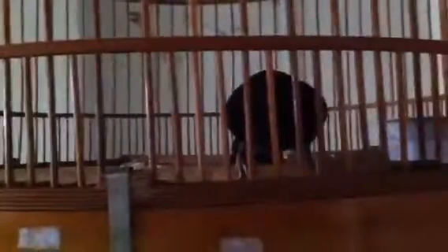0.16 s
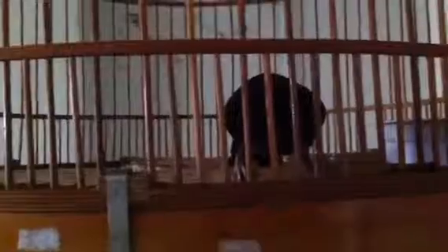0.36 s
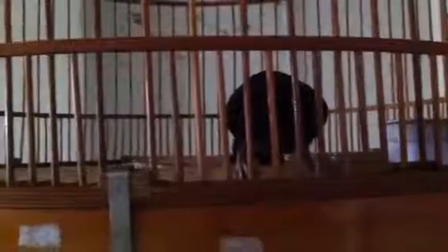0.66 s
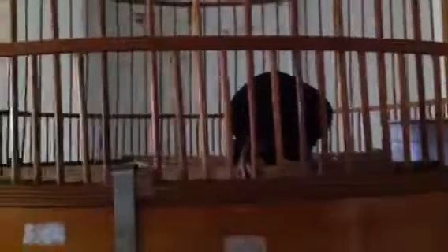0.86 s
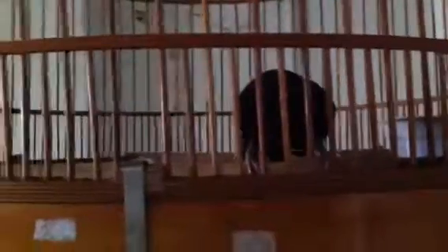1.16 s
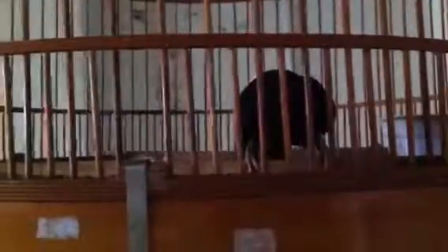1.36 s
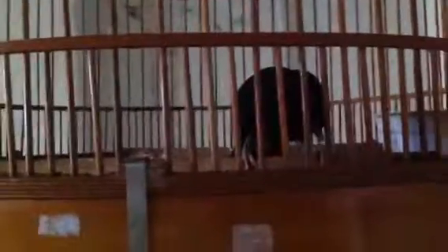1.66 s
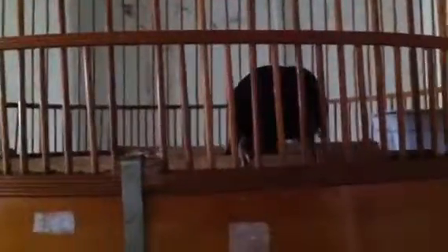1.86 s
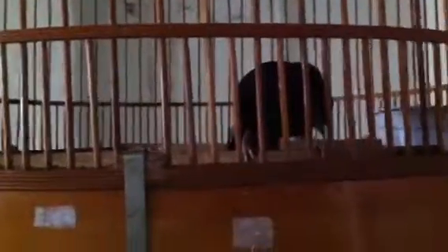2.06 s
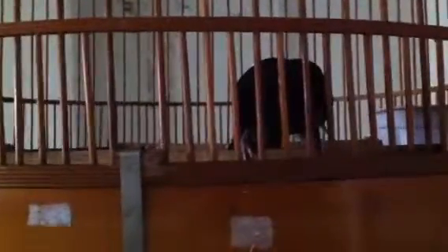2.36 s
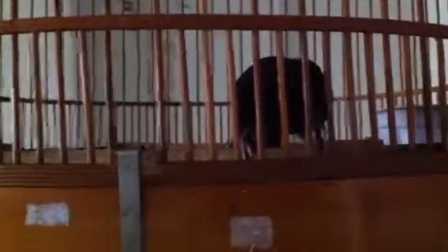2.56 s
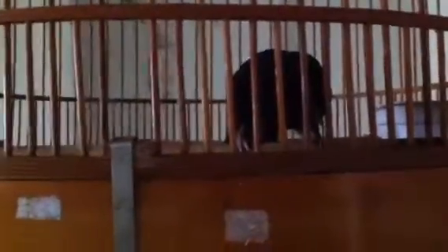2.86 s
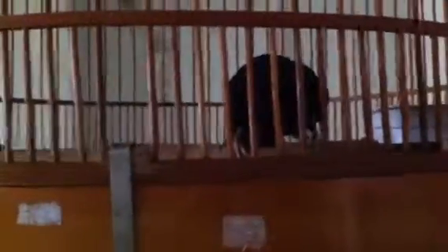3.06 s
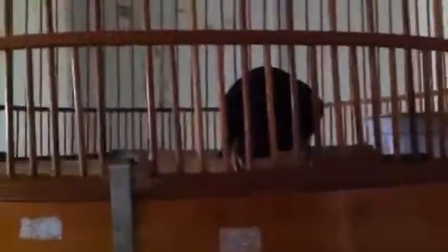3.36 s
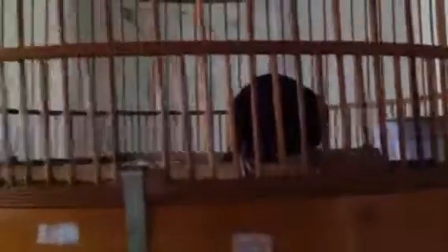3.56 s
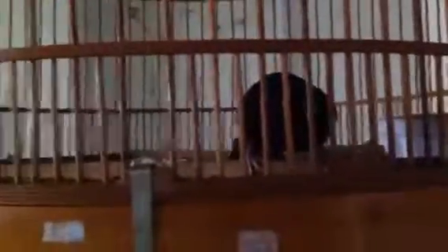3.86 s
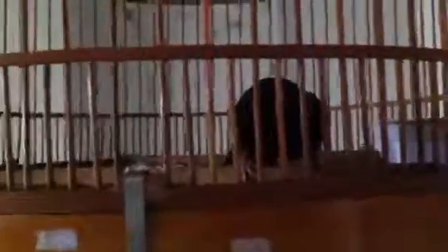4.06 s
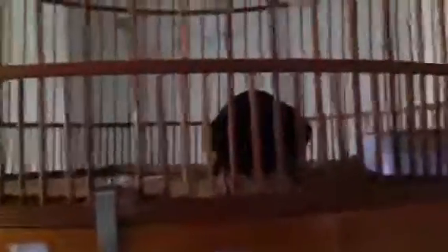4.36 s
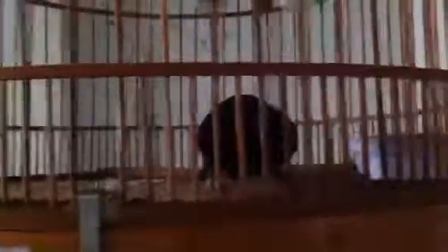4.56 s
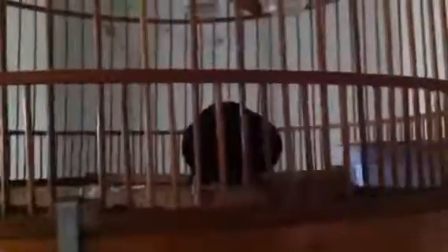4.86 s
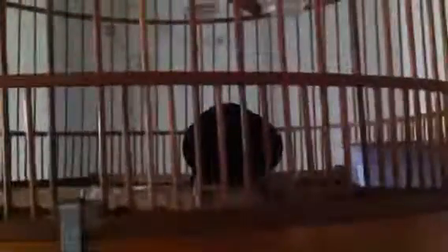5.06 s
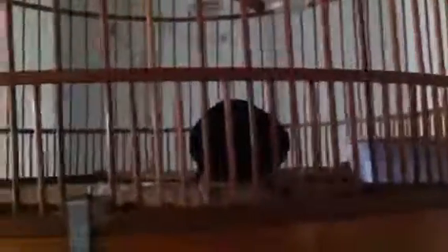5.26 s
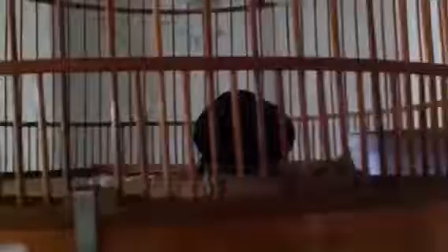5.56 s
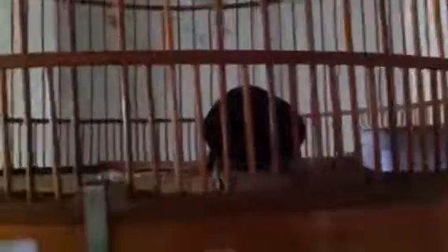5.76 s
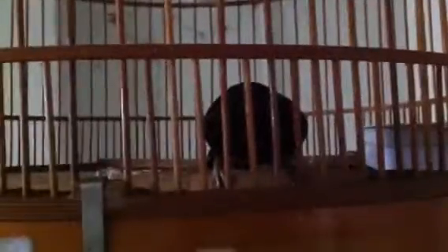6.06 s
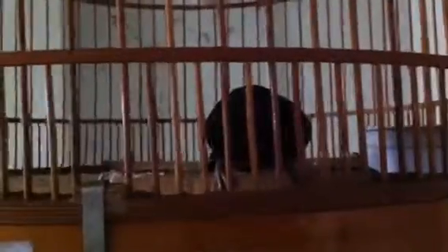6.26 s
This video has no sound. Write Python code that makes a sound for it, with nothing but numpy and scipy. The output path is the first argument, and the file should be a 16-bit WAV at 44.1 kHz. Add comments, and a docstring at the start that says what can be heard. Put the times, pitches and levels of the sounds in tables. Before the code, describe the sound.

In a small echoing room, a songbird twitters, whoops and warbles, then gives a series of high, falling whistles.

```python
"""A caged shama sings close by in a small, hard-walled room.
A brief warble and a soft twitter lead into low chuckles, loud arched whoops and a longer, harsh warble;
then come six thin, falling whistles, the first few over more twitter. Its syrinx makes gliding tones,
coloured by throat and beak and roughened by rasp; its second side joins in atop the later whoops.
Airy rustles lie between the notes, and the walls ring on after each one over faint air and hum."""
import sys
import numpy as np
from scipy import signal
from scipy.fft import rfft, irfft
from scipy.io import wavfile
from scipy.ndimage import uniform_filter1d, minimum_filter1d

SR = 44100
rng = np.random.default_rng(int(sys.argv[2]) if len(sys.argv) > 2 else 0)


def dump_mix(stems):
    """Bounce the given channels to the path in sys.argv[1] as a 16-bit WAV at rate SR."""
    frames = np.atleast_2d(stems).T  # one column per channel
    limited = np.clip(frames, -1, 1)  # hard clip at full scale
    pcm = np.round(limited * 32767).astype(np.int16)
    wavfile.write(sys.argv[1], SR, pcm)


N = 282240
T = np.arange(N) / SR


def from_db(db):
    """Decibels to gain."""
    return 10 ** (np.asarray(db) / 20)


def along(rows, at):
    """Every column of a table, joined by straight lines over its first."""
    first, *columns = np.transpose(rows)
    return [np.interp(at, np.sort(first), column) for column in columns]


def at_hz(points, hz):
    """An EQ curve, read on a log-frequency axis."""
    points_hz, values = np.transpose(points)
    return np.interp(np.log(hz + 1), np.log(points_hz), values)


def span(start, end):
    """Sample numbers between two times."""
    return np.arange(max(int(start * SR), 0), min(int(end * SR), N))


def progress(i, start, length):
    """Share of a stretch of time that has passed, 0-1."""
    return np.clip((T[i] - start) / length, 0, 1)


def noise(colour):
    """Noise shaped by an EQ curve, rms 1."""
    hz = np.arange(N // 2 + 1) * SR / N
    x = irfft(rfft(rng.standard_normal(N)) * from_db(at_hz(colour, hz)), N)
    return x / x.std()


def flutter(rate_hz):
    """Random modulation up to a given rate, rms 1."""
    x = signal.sosfilt(signal.butter(2, rate_hz, fs=SR, output="sos"), rng.standard_normal(N))
    return x / x.std()


def phase_of(hz):
    """Phase of an oscillator that follows a pitch curve."""
    return 2 * np.pi * np.cumsum(hz) / SR


def fade(i, edge_s):
    """Linear fade in and out."""
    return np.clip(np.minimum(i - i[0], i[-1] - i) / (edge_s * SR), 0, 1)


# overtone EQ of the throat and open beak: (frequency [Hz], level re the fundamental [dB])
THROAT_EQ = [(1500, -32.5), (2500, -15), (3800, -35.5), (5000, -27.5), (6300, -32.5), (8000, -32),
             (9500, -25.5), (11000, -29.5), (14000, -22.5), (16000, -39.5)]
# the beak lets most overtones out at mid pitch: (sung pitch [Hz], overtone gain [dB])
BEAK_BRIGHTNESS = [(900, -14), (1600, -4.5), (2280, 0), (2800, -1.5)]


def syrinx(notes, hiss_colour, overtone_db, jitter, shimmer_db, hiss_db, harmonics):
    """A gliding tone with weak overtones; rasp shakes its pitch, breaks up its level and adds hiss."""
    out, shake, throb, hiss = np.zeros(N), flutter(310), flutter(87), noise(hiss_colour)
    for i, hz, level_db, rasp in notes:
        phase = phase_of(hz * (1 + jitter * rasp * shake[i]))
        voice = np.sin(phase) + from_db(hiss_db) * rasp * hiss[i]
        beak_db = overtone_db + at_hz(BEAK_BRIGHTNESS, hz)
        for k in range(2, harmonics + 1):
            gain = from_db(at_hz(THROAT_EQ, k * hz) + beak_db)
            voice += gain * np.sin(k * phase) * (k * hz < SR / 2)
        out[i] += from_db(level_db + shimmer_db * rasp * throb[i]) * voice * fade(i, 0.0041)
    return out


# high sizzle on a warble: (frequency [Hz], level [dB])
WARBLE_SIZZLE = [(1000, -42), (3000, 6.5), (8000, -28), (9300, 7.5), (12000, -2.5), (16000, -5)]
# quick slurs: (time [s], length [s], first pitch [Hz], last pitch [Hz], bend [exponent], level [dB])
WARBLE_SLURS = [(0, 0.017, 1722, 2580, 1.26, -13), (0.016, 0.039, 3240, 2190, .9, -13.5),
                (0.044, .033, 1898, 1489, 1.14, -11.5), (2.663, 0.035, 1766, 1313, 1.1, -17.5),
                (2.69, 0.043, 2010, 2390, 0.37, -18.5), (2.731, 0.023, 3320, 2520, 0.56, -15),
                (2.76, 0.035, 1907, 1453, 0.77, -15), (2.892, .038, 1820, 2662, 1.68, -7),
                (2.944, .042, 3190, 2203, 1.33, -13), (2.988, 0.03, 1712, 1643, 0.85, -10.5),
                (3.007, 0.05, 1792, 2190, 0.24, -15.5), (3.06, 0.033, 3054, 2237, 1.04, -14.5),
                (3.09, 0.031, 1770, 1562, 0.75, -12)]


def warbles(wobble_hz=47.56, wobble_depth=0.033, edge_db=-5.5, rasp=0.11):
    """Harsh runs of wavering slurs that rise, fall and land low, each slur loudest in its middle."""
    notes = []
    for start, length, first_hz, last_hz, bend, peak_db in WARBLE_SLURS:
        i = span(start, start + length)
        share = progress(i, start, length)
        glide_hz = first_hz + (last_hz - first_hz) * share ** bend
        wobble = 1 - wobble_depth * np.cos(2 * np.pi * wobble_hz * (T[i] - start))
        notes.append((i, glide_hz * wobble, peak_db + edge_db * (2 * share - 1) ** 2, rasp))
    return syrinx(notes, WARBLE_SIZZLE, overtone_db=-1.5, jitter=0.19, shimmer_db=18,
                  hiss_db=-6.5, harmonics=8)


# narrow burr under the twitter: (frequency [Hz], level [dB])
BURR_EQ = [(1000, -36), (1250, -17), (1450, -4), (1650, 0), (1800, -9), (2000, -1.5), (2300, -20),
           (3000, -42)]
# bouts of twitter: (time [s], first pitch [Hz], settled pitch [Hz], first level [dB],
# settled level [dB], last note level [dB], lead-in level [dB])
TWITTER_BOUTS = [(.275, 1979, 2133, -45, -34.5, -45.5, -55.5), (3.825, 1874, 2086, -45, -37.5, -53, -59)]


def twitter(count=11, note_s=0.078, pace_s=0.095, slowing_s=0.0012, settle_notes=1.8, jitter=0.012,
            lead_s=0.17, lead_hz=987, lead_jitter=0.05, throb_db=2, burr_db=-48.5, burr_hold_s=1.013):
    """A hoarse low lead-in, then soft pulsing notes that slow a little and settle, over a burr."""
    out, shake, throb, burr = np.zeros(N), flutter(130), flutter(45), noise(BURR_EQ)
    for start, first_hz, settled_hz, first_db, settled_db, last_db, lead_db in TWITTER_BOUTS:
        notes = [(start - lead_s, lead_s, lead_hz, lead_db, lead_jitter)]
        for k in range(count):
            unsettled = np.exp(-k / settle_notes)
            hz = settled_hz + (first_hz - settled_hz) * unsettled
            level_db = last_db if k == count - 1 else settled_db + (first_db - settled_db) * unsettled
            notes.append((start + pace_s * k + slowing_s * k ** 2, note_s, hz, level_db, jitter))
        for onset, length, hz, level_db, unsteady in notes:
            i = span(onset, onset + length)
            tone = np.sin(phase_of(hz * (1 + unsteady * shake[i])))
            out[i] += from_db(level_db + throb_db * throb[i]) * tone * fade(i, 0.012)
        # the burr fades in at 133 dB/s and out at 147 dB/s
        drop_db = 133 * np.maximum(start - T, 0) + 147 * np.maximum(T - start - burr_hold_s, 0)
        out += from_db(burr_db - drop_db) * burr
    return out


# a rustle's airy top and its lower body: (frequency [Hz], level [dB])
RUSTLE_TOP_EQ = [(1000, -18.5), (2500, -4.5), (3700, -2), (6300, -2), (10000, -13), (16000, -26.5)]
RUSTLE_BODY_EQ = [(300, -29), (550, -11), (750, -4), (1100, -6.5), (1500, -1.5), (2500, -1), (4000, -2.5),
                  (8000, -30)]
# rustle cues: (time [s], length [s], level [dB], body re the top [dB])
RUSTLE_CUES = [(0.562, 0.11, -49.5, -20), (0.776, 0.12, -49.5, -13), (1.032, 0.21, -49.5, -6.5),
               (1.696, 0.057, -42, -7), (1.923, 0.18, -46.5, 2), (2.2, 0.081, -47, 3.5),
               (3.345, 0.11, -50.5, -7.5), (3.581, 0.093, -44.5, -21), (3.76, 0.2, -47.5, -8.5),
               (3.98, 0.18, -46.5, -5), (4.289, 0.16, -49.5, -2), (5.132, 0.11, -44.5, -10.5),
               (5.488, 0.14, -45.5, -6), (5.693, 0.23, -46, -3), (6.098, 0.15, -45, -5)]


def rustles(edge_s=0.03):
    """Short, soft puffs of noise between the notes."""
    out, top, body = np.zeros(N), noise(RUSTLE_TOP_EQ), noise(RUSTLE_BODY_EQ)
    for start, length, level_db, body_db in RUSTLE_CUES:
        i = span(start, start + length)
        out[i] += from_db(level_db) * (top[i] + from_db(body_db) * body[i]) * fade(i, edge_s)
    return out


# broad hiss of rasp, shared by chuckles, whoops and upper voice: (frequency [Hz], level [dB])
RASP_EQ = [(1500, -22.5), (3300, -5.5), (8200, 7), (10500, -7.5), (15000, -8)]
# low notes around the whoops; a positive scoop starts flat, a negative one drops in from above:
# (middle time [s], length [s], middle pitch [Hz], level [dB], scoop [share of pitch])
CHUCKLE_NOTES = [(1.137, 0.065, 948.6, -19, 0.24), (1.189, .054, 1217, -13.5, .12),
                 (1.239, 0.035, 996, -11.5, 0.24), (1.305, 0.049, 899, -12.5, 0.19),
                 (1.425, 0.051, 794, -24, -0.082), (1.523, .055, 868.4, -20, 0.15),
                 (1.626, 0.034, 902.5, -13, -0.13), (1.737, 0.049, 903.7, -17, 0.19),
                 (1.847, 0.03, 886, -18.5, -0.19), (1.965, .05, 890, -22, 0.06),
                 (2.104, 0.046, 900, -20, -0.41), (2.231, 0.052, 873, -23.5, 0.3),
                 (2.351, .046, 902.7, -18.5, -0.39), (2.461, 0.038, 943, -19.5, 0.27),
                 (2.591, .04, 1435, -11.5, -.15)]


def chuckles(sag=0.056, edge_db=-21, taper=1.01, rasp=0.22):
    """Short, mellow notes: the pitch slides in as each swells and sags as it fades."""
    notes = []
    for middle, length, middle_hz, peak_db, scoop in CHUCKLE_NOTES:
        i = span(middle - length / 2, middle + length / 2)
        side = 2 * progress(i, middle - length / 2, length) - 1
        hz = middle_hz * (1 - np.where(side < 0, scoop, sag) * side ** 2)
        notes.append((i, hz, peak_db + edge_db * np.abs(side) ** taper, rasp))
    return syrinx(notes, RASP_EQ, overtone_db=0.5, jitter=0.07, shimmer_db=10.5,
                  hiss_db=-27, harmonics=10)


# loud arches: (time [s], climb [s], first pitch [Hz], top pitch [Hz], bend [exponent],
# onset flick [0-1], level [dB], rasp at the top [0-1], dive [s], landing pitch [Hz])
WHOOP_NOTES = [(1.35, 0.022, 1793, 2465, 1.09, 0.05, -8.5, 0.58, 0.024, 1700),
               (1.551, 0.032, 2150, 2894, 1.3, 0.95, -3, 0, 0.029, 1050),
               (1.762, .05, 2220, 2700, .85, 1, -5.5, .4, 0.019, 1000),
               (1.994, 0.077, 2284, 2747, 0.64, 0.6, -6.5, 0.5, 0.05, 1050),
               (2.255, .055, 2275, 2970, 1.8, 0.4, -6.5, .4, 0.033, 1072),
               (2.484, .056, 2100, 2727, 0.88, 0, -6, 0.26, 0.045, 1450)]


def whoops(leap_s=0.02, low_hz=1050, attack_s=0.0066, release_s=0.013,
           flick_hz=234, flick_s=0.004, first_rasp=0.12):
    """The voice leaps from its low register, climbs while it swells and roughens, then dives away."""
    notes = []
    for row in WHOOP_NOTES:
        start, climb_s, first_hz, top_hz, bend, flick, peak_db, top_rasp, dive_s, landing_hz = row
        i = span(start - leap_s, start + climb_s + dive_s)
        t = T[i] - start
        leap = np.sin(np.pi / 2 * progress(i, start - leap_s, leap_s))
        climb = progress(i, start, climb_s)
        dive = progress(i, start + climb_s, dive_s)
        hz = low_hz + (first_hz - low_hz) * leap
        hz += (top_hz - first_hz) * climb ** bend + (landing_hz - top_hz) * dive
        hz += flick * flick_hz * np.exp(-(t / flick_s) ** 2)   # overshoot at the onset
        # the envelope peaks part of the way up the climb
        knees_s = [-leap_s, -attack_s, 0, 0.738 * climb_s, climb_s, climb_s + release_s, climb_s + dive_s]
        swell_db = np.interp(t, knees_s, [-37, -27.5, -5, 0, -4, -23.5, -29])
        rasp = first_rasp + (top_rasp - first_rasp) * climb ** 0.85
        notes.append((i, hz, peak_db + swell_db, rasp))
    return syrinx(notes, RASP_EQ, overtone_db=0.25, jitter=0.05, shimmer_db=8,
                  hiss_db=-19.5, harmonics=8)


# envelope of one upper note: (time from its peak [s], pitch [ratio], level [dB], rasp [0-1])
UPPER_ENVELOPE = [(-.04, 1, -8.5, 0.26), (-.013, 1.15, -11, 0.36), (0, 1, 2, .25), (0.02, 1, -38.5, 0.9)]
# upper notes: (peak time [s], pitch [Hz], level [dB])
UPPER_NOTES = [(1.816, 2855, -10.5), (2.07, 2983, -12), (2.311, 2833, -12.5), (2.555, 2850, -9.5)]


def upper_voice():
    """The other side of the syrinx sings a short second arch over the top of a whoop."""
    notes = []
    for peak_s, hz, note_db in UPPER_NOTES:
        i = span(peak_s + UPPER_ENVELOPE[0][0], peak_s + UPPER_ENVELOPE[-1][0])
        ratio, swell_db, rasp = along(UPPER_ENVELOPE, T[i] - peak_s)
        notes.append((i, hz * ratio, note_db + swell_db, rasp))
    return syrinx(notes, RASP_EQ, overtone_db=8.5, jitter=0.12, shimmer_db=6, hiss_db=-22, harmonics=3)


# envelope of one whistle:
# (position [0-1], level [dB], overtones [dB], lower voice [dB], warble depth [share of pitch])
WHISTLE_ENVELOPE = [(0, -20.5, -26, -57, 0), (.2, -18, -13, -31.5, 0), (.42, -4.5, -13, -26, 0),
                    (.6, -2, -2.5, -42.5, 0.024), (.76, -11, 1.5, -40.5, 0.043), (1, -20, 4.5, -48, 0.051)]
# falling whistles:
# (time [s], length [s], top pitch [Hz], end pitch [Hz], bend [exponent], level [dB], brightness [dB])
WHISTLE_NOTES = [(3.818, 0.096, 6820, 3440, 1.54, -20.5, -15.5), (4.373, 0.15, 6734, 3300, 1.25, -11.5, -7),
                 (4.756, 0.15, 6495, 3344, 1.69, -9.5, -6.5), (5.135, .154, 6390, 3407, 1.58, -10.5, -8),
                 (5.554, 0.14, 6300, 3438, 1.5, -11.5, -7.5), (6.135, .13, 6530, 3384, 1.39, -16, -11)]


def whistles(warble_hz=68, jitter=0.0092, rough=0.35, lower_hz=3480, lower_rise_hz=380, waver=0.016):
    """Each whistle swells as it falls, and breaks into a rough warble as it nears a faint lower voice."""
    out, shake, sway, grit = np.zeros(N), flutter(970), flutter(70.7), flutter(1300)
    for start, length, top_hz, end_hz, bend, note_db, bright_db in WHISTLE_NOTES:
        i = span(start, start + length)
        share = progress(i, start, length)
        swell_db, overtone_db, lower_db, depth = along(WHISTLE_ENVELOPE, share)
        hz = top_hz - (top_hz - end_hz) * share ** bend
        hz *= 1 - 0.046 * np.exp(-share / 0.036)   # a small scoop up into the note
        force = np.clip(from_db(bright_db + 9), 0, 1) ** 2   # gently sung whistles stay smooth
        warble = force * depth * np.sin(phase_of(warble_hz * (1 + 0.465 * sway[i])))
        phase = phase_of(hz * (1 + warble + jitter * shake[i] + 0.0077 * sway[i]))
        overtones = (np.sin(2 * phase) + from_db(-5) * np.sin(3 * phase)) * (1 + rough * grit[i])
        voice = from_db(swell_db) * (np.sin(phase) + from_db(bright_db + overtone_db) * overtones)
        lower_phase = phase_of((lower_hz + lower_rise_hz * share) * (1 + waver * shake[i]))
        lower = from_db(lower_db) * (np.sin(lower_phase) + from_db(-4) * np.sin(2 * lower_phase))
        out[i] += from_db(note_db) * (voice + lower) * fade(i, 0.0014)
    return out


# early reflections off the cage and nearest walls: (delay [s], level [dB])
REFLECTIONS = [(.0052, -25), (.0093, -18), (.0147, -16.5)]
# reverb tail: (band centre [Hz], time to fall 60 dB [s], level [dB])
REVERB_BANDS = [(302, 0.91, -17.5), (900, 0.31, -2), (1723, 0.5, -5.5), (2700, 0.44, -7.5),
                (5200, 0.47, -7.5), (8600, 0.45, -7.5), (16930, 0.033, -5)]


def reverb(x, build_s=0.0098):
    """Hard walls return a few near echoes, then a dense tail that rings longest in the bass."""
    t, hz = T[:SR], np.arange(SR // 2 + 1)
    white = rfft(rng.standard_normal(SR))
    response = np.zeros(SR)
    for centre_hz, t60, level_db in REVERB_BANDS:
        crossover = at_hz([(row[0], row[0] == centre_hz) for row in REVERB_BANDS], hz)
        band = irfft(white * crossover, SR)
        decay = from_db(-60 * t / t60) * np.minimum(t / build_s, 1) ** 2
        response += from_db(level_db) * band * decay / np.sqrt(np.sum(decay ** 2))
    for delay, level_db in REFLECTIONS:
        response[int(delay * SR)] += from_db(level_db)
    return signal.fftconvolve(x, response)[:N]


# still air: (frequency [Hz], level [dB])
AIR_EQ = [(80, -29), (140, 2), (300, 2.5), (500, -1.5), (1000, -1.5), (6000, -8), (10000, -12),
          (16000, -25.5)]
# faint hum: (frequency [Hz], rms level [dB])
HUM_TONES = [(140.0, -81.5), (247.6, -78), (296.1, -77), (344.5, -76.5)]


def room_tone(air_db=-64.5):
    """A steady bed of still air and faint hum."""
    hum = sum(from_db(db) * np.sqrt(2) * np.sin(2 * np.pi * hz * T) for hz, db in HUM_TONES)
    return from_db(air_db) * noise(AIR_EQ) + hum


def scene():
    """The bird faces the listener when it sings out; the rustles come more by way of the walls."""
    song = chuckles() + whoops() + upper_voice() + warbles()
    high, soft, puffs = whistles(), twitter(), rustles()
    direct = song + high + soft + from_db(-4.5) * puffs
    send = song + from_db(-1.5) * high + soft + from_db(3.5) * puffs
    return (direct + reverb(send) + room_tone())[None]


def record(dry, ceiling_db=-3.3, release_db_per_s=250, cutoff_hz=16000):
    """A fast limiter holds the loudest notes; a steep low-pass trims the top."""
    over_db = np.maximum(20 * np.log10(np.abs(dry[0]) + 1e-9) - ceiling_db, 0)
    held_db = np.maximum.accumulate(over_db + release_db_per_s * T) - release_db_per_s * T
    gain_db = uniform_filter1d(minimum_filter1d(-held_db, size=89), size=89)   # 2 ms look-ahead
    low_pass = signal.ellip(12, 0.1, 90, cutoff_hz, fs=SR, output="sos")
    return signal.sosfilt(low_pass, dry * from_db(gain_db))


dry = scene()
out = record(dry)
dump_mix(out)
```